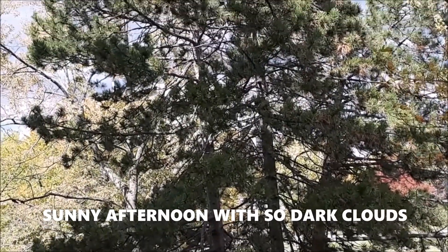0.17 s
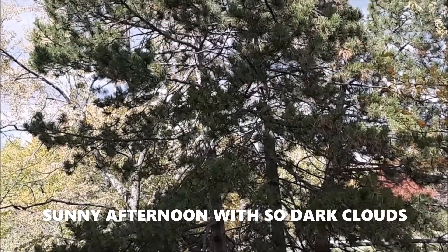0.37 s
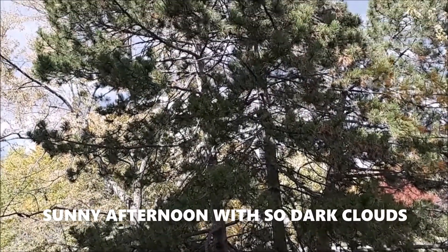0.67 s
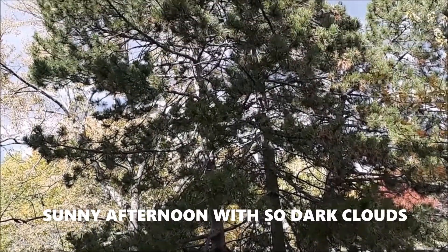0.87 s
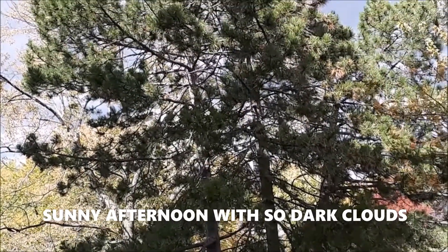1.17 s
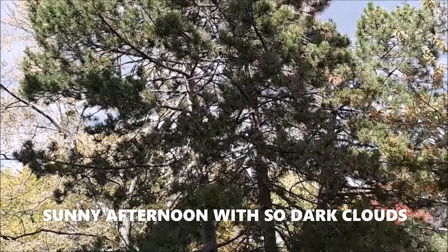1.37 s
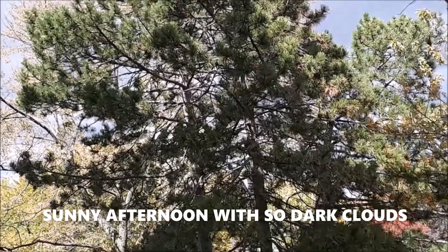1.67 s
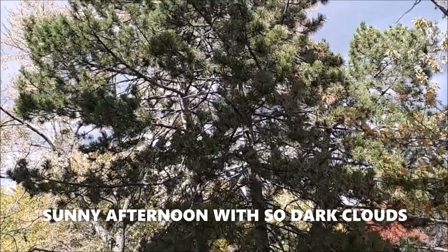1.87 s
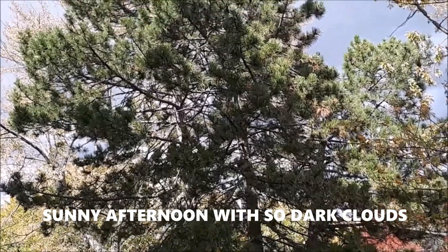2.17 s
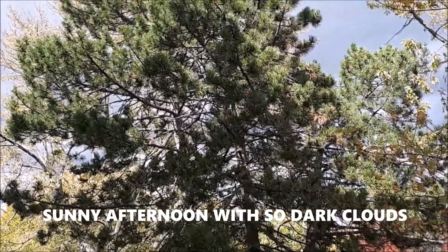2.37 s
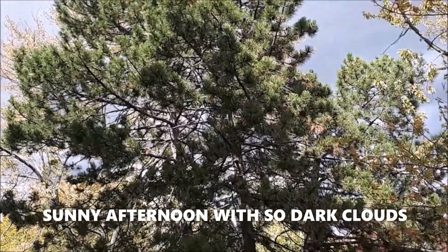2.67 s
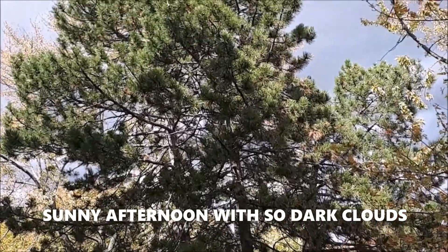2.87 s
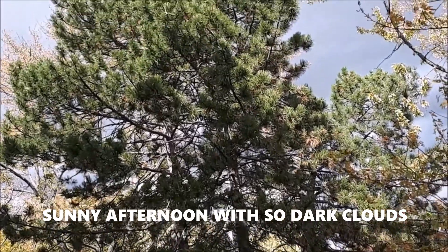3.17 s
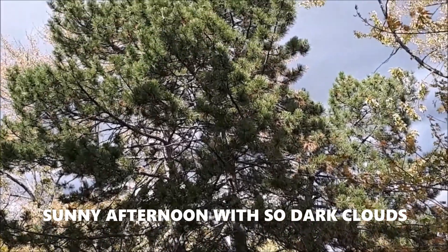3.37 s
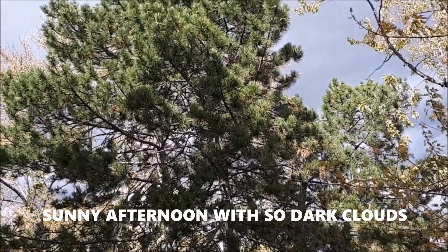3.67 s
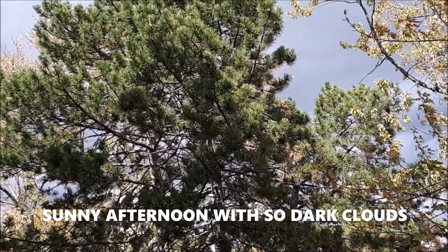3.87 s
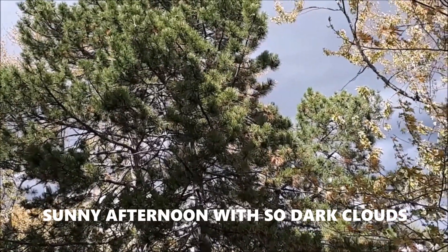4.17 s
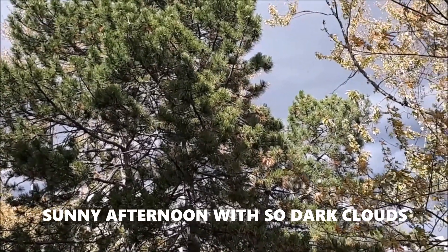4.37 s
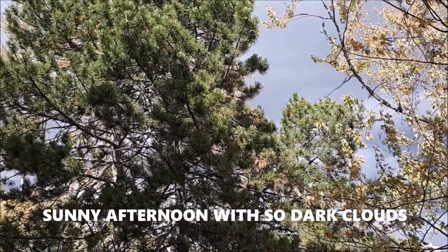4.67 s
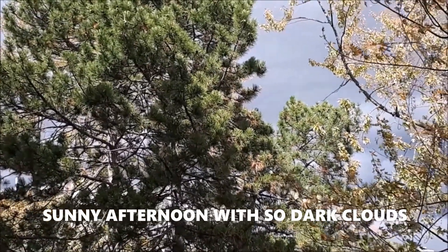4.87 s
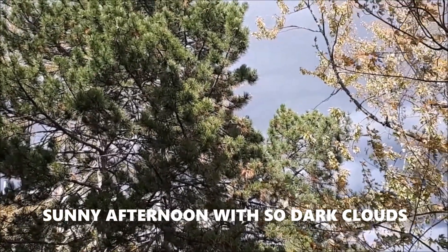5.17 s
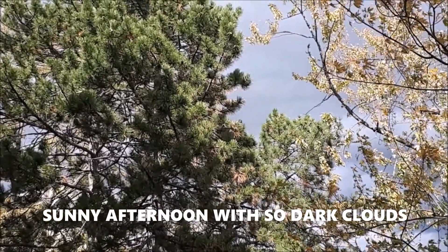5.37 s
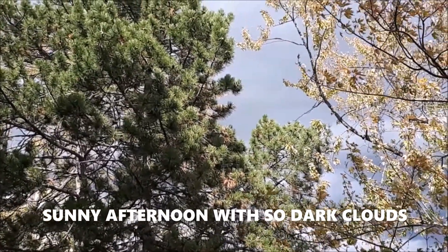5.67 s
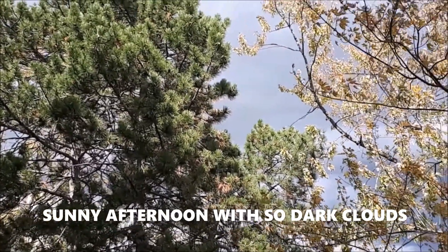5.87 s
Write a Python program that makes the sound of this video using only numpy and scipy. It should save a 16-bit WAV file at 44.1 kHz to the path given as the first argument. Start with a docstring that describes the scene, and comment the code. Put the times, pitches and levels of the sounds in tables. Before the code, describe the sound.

Soft wind rustles autumn foliage, with deep rumbling buffets in the first four seconds and a few tiny high bird chirps echoing among trees.

```python
"""Breeze in autumn trees

A slowly easing breeze hisses through pines and rustles dry leaves: shaped noise and thousands of small ticks.
Gusts of low noise and short decaying swings of pressure buffet the microphone with soft thumps.
Small birds give thin, high calls, gliding tones that the trees scatter into echoes, over a faint hiss.
The microphone is nearly mono, with a deep notch and a port resonance in the treble."""
import sys
import numpy as np
from scipy import signal
from scipy.fft import rfft, irfft
from scipy.io import wavfile
from scipy.ndimage import uniform_filter1d

SR = 44100
rng = np.random.default_rng(int(sys.argv[2]) if len(sys.argv) > 2 else 0)


def transcribe(signal):
    """Save signal, clipped to [-1, 1], as a 16-bit WAV file at the path in sys.argv[1]."""
    frames = np.atleast_2d(signal).T
    limited = np.clip(frames, -1, 1)
    pcm = np.round(limited * 32767).astype(np.int16)
    wavfile.write(sys.argv[1], SR, pcm)


N = 265614
TIME = np.arange(N) / SR  # seconds
BIN_HZ = np.maximum(np.arange(N // 2 + 1) * SR / N, 1)


def from_db(db):
    """Decibels to gain."""
    return 10 ** (np.asarray(db) / 20)


def rms_one(x):
    """Scale to unit power."""
    return x / np.sqrt(np.mean(x ** 2) + 1e-20)


def colour(x, points):
    """Filter by a spectrum drawn on a log-frequency axis."""
    hz, db = np.transpose(points)
    gain = from_db(np.interp(np.log(BIN_HZ), np.log(hz), db))
    return irfft(rfft(x) * gain, N)


def drift(rate_hz):
    """Random motion of spread 1, weaker and weaker above its rate."""
    lowpass = 1 / (1 + (BIN_HZ / rate_hz) ** 2)
    return rms_one(irfft(rfft(rng.standard_normal(N)) * lowpass, N))


def swaying(x, sway_db, rate_hz, count=12):
    """Each bough sways by itself, so each region of pitch swells and fades by itself."""
    place = np.interp(np.log(BIN_HZ), np.log([200, 14000]), [0, count - 1])
    whole = rfft(x)
    total = np.zeros(N)
    for k in range(count):
        region = irfft(whole * np.maximum(1 - abs(place - k), 0), N)  # overlapping triangles
        total += region * from_db(sway_db * drift(rate_hz))
    return total


# Tone of the rustling leaves. Each row: frequency in Hz, relative level in dB per Hz.
RUSTLE_SPECTRUM = [(500, -16.5), (1200, 0), (2200, 1.5), (3400, 4.5), (4500, 3.5), (6400, 4), (7700, 0.5),
                   (8600, 4.5), (9300, -7), (11000, -13.5), (15000, -23)]


def foliage(rustle_db, touches_per_s, size_spread_db, touch_db):
    """Needles hiss while leaves tick against each other, more often in a stronger wind."""
    wind = from_db(rustle_db - rustle_db.mean())
    touching = rng.random(N) < touches_per_s * wind / SR
    sizes = from_db(size_spread_db * np.minimum(rng.exponential(1, N), 5))
    ticks = touching * sizes * rng.choice([-1, 1], N)
    air = rng.standard_normal(N) + from_db(touch_db) * rms_one(ticks)
    return from_db(rustle_db) * rms_one(colour(swaying(air, sway_db=0.34, rate_hz=6.0), RUSTLE_SPECTRUM))


# Tone of the sough in the boughs. Each row: frequency in Hz, relative level in dB per Hz.
SOUGH_SPECTRUM = [(30, -11), (60, 0.5), (150, 0), (250, -4), (350, -2.5), (600, -2.5), (1000, -5),
                  (1600, -10.5), (3000, -13.5), (8000, -38.5)]


def boughs():
    """Vortices shed by countless twigs merge into a soft roar."""
    return rms_one(colour(swaying(rng.standard_normal(N), sway_db=1.0, rate_hz=4.7), SOUGH_SPECTRUM))


# The breeze slowly eases: starting levels in dB, changes in dB per s.
SOUGH_DB, SOUGH_DB_PER_S = -58.5, -0.39
RUSTLE_DB, RUSTLE_DB_PER_S = -53.5, -0.17


def trees():
    """The boughs' roar and the leaves' rustle, each easing at its own pace."""
    sough = from_db(SOUGH_DB + SOUGH_DB_PER_S * TIME) * boughs()
    rustle_db = RUSTLE_DB + RUSTLE_DB_PER_S * TIME
    return sough + foliage(rustle_db, touches_per_s=3000, size_spread_db=3.0, touch_db=-7.5)


def churn(spectrum, apart_db):
    """Turbulence of even strength, slightly apart in the two channels."""
    noise = colour(rng.standard_normal((2, N)), spectrum)
    common, apart = noise / np.sqrt(uniform_filter1d(noise ** 2, size=SR // 6))
    return common + from_db(apart_db) * apart * [[1], [-1]]


GUST_RISE_SHARE = 0.47  # part of a gust's length before its peak


def gust(peak_s, length_s, db):
    """Power of a gust: a smooth swell and a smooth fall."""
    share = np.where(TIME < peak_s, GUST_RISE_SHARE, 1 - GUST_RISE_SHARE)
    return from_db(db) ** 2 * np.exp(-2 * ((TIME - peak_s) / (length_s * share)) ** 2)


EDDY_DECAY_CYCLES = 0.55  # a larger eddy swings more slowly and lasts longer


def eddy(s, db, hz):
    """One quick swing of pressure as a vortex crosses the port."""
    swing = np.cos(2 * np.pi * hz * (TIME - s) + rng.uniform(0, 2 * np.pi))
    return from_db(db) * np.exp(-abs(TIME - s) * hz / EDDY_DECAY_CYCLES) * swing


# Tone of the steady flow at the port. Each row: frequency in Hz, relative level in dB per Hz.
FLOW_SPECTRUM = [(3, 0), (12, 12), (20, 2.5), (30, 4), (50, -10.5), (70, -10.5), (110, -19.5), (200, -31),
                 (500, -69)]
# Low rumbling tone of the gusts, strongest near 24 Hz. Each row: frequency in Hz, relative level in dB per Hz.
GUST_SPECTRUM = [(5, -9.5), (14, 6), (24, 12), (35, -5), (55, -12.5), (100, -19), (200, -33.5), (500, -61)]
# Gusts that swell and die. Each row: peak in seconds, length in seconds, level in dB.
GUST_ROWS = [(.7, 0.48, -43.5), (1.567, 0.47, -44.5), (2.25, .25, -44), (2.864, 0.26, -41.5),
             (3.16, 0.24, -43), (3.98, 0.2, -49.5)]
# Sharp eddies. Each row: centre in seconds, pressure in dB before the common lift eddy_db, swing in Hz.
EDDY_ROWS = [(.431, -35, 60), (0.588, -33, 38), (.784, -35.5, 33.4), (1.488, -38, 42), (1.67, -41, 37),
             (1.95, -27.5, 56), (1.982, -35.5, 40.5), (2.165, -44, 48), (2.24, -35.5, 42), (2.906, -43, 58),
             (3.13, -35.5, 62), (3.172, -27, 40.3), (3.261, -39.5, 41.6), (3.389, -40.5, 58),
             (3.739, -39, 50), (3.959, -45, 54.7)]
FLOW_DB, FLOW_DB_PER_S = -50, -0.1  # the weak steady flow eases too


def buffeting(eddy_db):
    """The steady flow murmurs at the port, gusts rumble over it and sharp eddies thump through both."""
    flow = from_db(FLOW_DB + FLOW_DB_PER_S * TIME) * churn(FLOW_SPECTRUM, apart_db=-18.5)
    gust_level = np.sqrt(sum(gust(*row) for row in GUST_ROWS))
    gusts = gust_level * churn(GUST_SPECTRUM, apart_db=-26)
    thumps = from_db(eddy_db) * sum(eddy(*row) for row in EDDY_ROWS)
    return flow + gusts + thumps


def note(s, length_s, db, glide, waver):
    """A thin tone that swells and fades along a glide of (share of the length, Hz), its pitch shaken by waver."""
    along = np.clip((TIME - s) / length_s, 0, 1)
    hz = np.interp(along, *np.transpose(glide)) * (1 + waver)
    swell = 2 * np.sqrt(along * (1 - along))
    return from_db(db) * swell * np.sin(2 * np.pi * np.cumsum(hz) / SR)


# Near birds. Each row: start in seconds, length in seconds, top in Hz, level in dB,
# hoarseness as a share of the pitch.
TSIP_ROWS = [(1.387, 0.04, 7400, -48, .009), (3.181, 0.037, 7430, -50, .014),
             (4.016, 0.072, 7370, -51, 0.011), (5.677, 0.061, 7730, -52, 0.033)]
TSIP_RISE, TSIP_SAG = .075, 0.019  # shares of the pitch
TSIP_TOP_AT = 0.607  # share of the length


def tsips():
    """Short, slightly hoarse calls that slide up and sag a little."""
    unsteady = drift(300)
    calls = np.zeros(N)
    for s, length_s, hz, db, hoarse in TSIP_ROWS:
        glide = [(0, hz * (1 - TSIP_RISE)), (TSIP_TOP_AT, hz), (1, hz * (1 - TSIP_SAG))]
        calls += note(s, length_s, db, glide, hoarse * unsteady)
    return calls


# Farther birds. Each row: start in seconds, length in seconds, pitch in Hz, level in dB.
WHISTLE_ROWS = [(0.088, 0.069, 6830, -54.5), (0.193, 0.07, 6500, -55), (1.632, 0.11, 6320, -55.5),
                (2.42, .07, 6720, -61), (2.535, .1, 6230, -60), (3.464, .16, 3960, -63),
                (3.798, 0.075, 3420, -61)]
WHISTLE_SAG, WHISTLE_WAVER = .006, 0.01506  # shares of the pitch


def whistles():
    """Faint wavering notes that sink slightly, mostly in falling pairs."""
    waver = WHISTLE_WAVER * drift(201)
    calls = np.zeros(N)
    for s, length_s, hz, db in WHISTLE_ROWS:
        calls += note(s, length_s, db, [(0, hz), (1, hz * (1 - WHISTLE_SAG))], waver)
    return calls


GROVE_T60_S = .8  # time for the echoes to fade by 60 dB


def grove(x, wet_db, count=2000):
    """Trunks and branches scatter a call into many fading echoes."""
    delays_s = rng.uniform(.004, .5, count)
    echoes = np.zeros(SR)
    echoes[(delays_s * SR).astype(int)] = rng.standard_normal(count) * from_db(-60 * delays_s / GROVE_T60_S)
    echoes /= np.sqrt(np.sum(echoes ** 2))
    return x + from_db(wet_db) * signal.fftconvolve(x, echoes)[:N]


# Tone of the faint hiss. Each row: frequency in Hz, relative level in dB per Hz.
HISS_SPECTRUM = [(300, -12), (2500, -20), (8000, -21), (11000, 13.5), (15000, 12.5)]


def faint_hiss():
    """Steady shaped noise, drawn separately for each channel."""
    return from_db(-78.0) * rms_one(colour(rng.standard_normal((2, N)), HISS_SPECTRUM))


def scene():
    """Trees, eddies, birds and hiss, almost alike in both channels."""
    calls = grove(tsips(), wet_db=-4) + grove(whistles(), wet_db=-1.0)
    return trees() + buffeting(eddy_db=0.5) + calls + faint_hiss()


# Resonances of the microphone port. Each row: frequency in Hz, width in Hz, added level in dB.
PORT_RESONANCES = [(8616, 78, -5), (9100, 120, -7)]
# Constant offset of the converters. Each row: one channel's offset as a share of full scale.
OFFSETS = [
    [.029],
    [.0258],
]
NOTCH_HZ, NOTCH_WIDTH_HZ, NOTCH_DEPTH_DB = 5457, 1800, -31
CUTOFF_HZ = 15000


def record(dry):
    """The microphone's duct cancels one pitch and rings at others; the top is cut, the converters sit off zero."""
    notched = signal.lfilter(*signal.iirnotch(NOTCH_HZ, NOTCH_HZ / NOTCH_WIDTH_HZ, fs=SR), dry)
    x = notched + from_db(NOTCH_DEPTH_DB) * dry  # a little leaks through the notch
    ringing = sum(from_db(db) * signal.lfilter(*signal.iirpeak(hz, hz / width_hz, fs=SR), x)
                  for hz, width_hz, db in PORT_RESONANCES)
    top_cut = signal.ellip(12, .1, 70, CUTOFF_HZ, fs=SR, output="sos")
    return signal.sosfilt(top_cut, x + ringing) + OFFSETS


dry = scene()
out = record(dry)
transcribe(out)
```